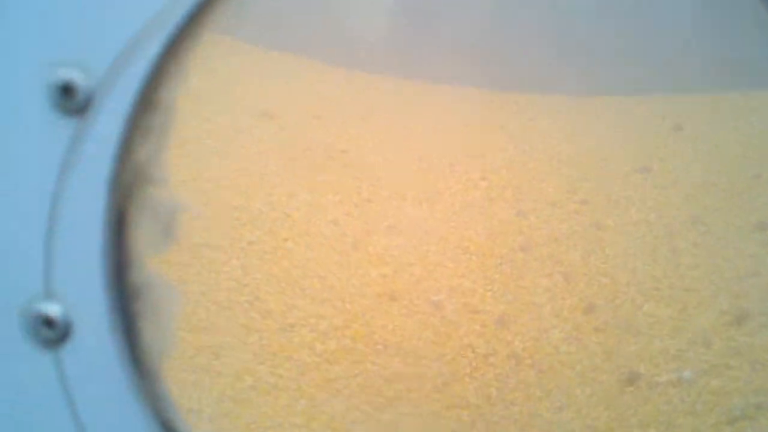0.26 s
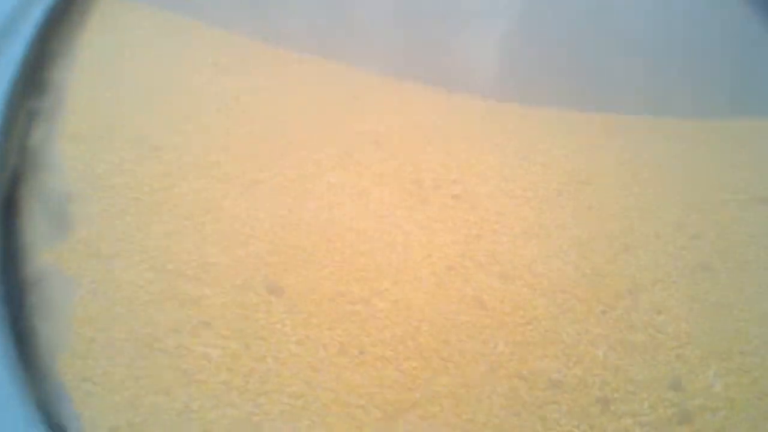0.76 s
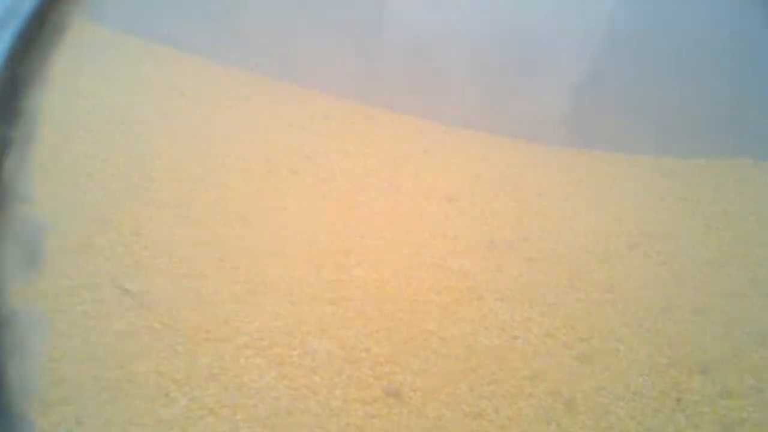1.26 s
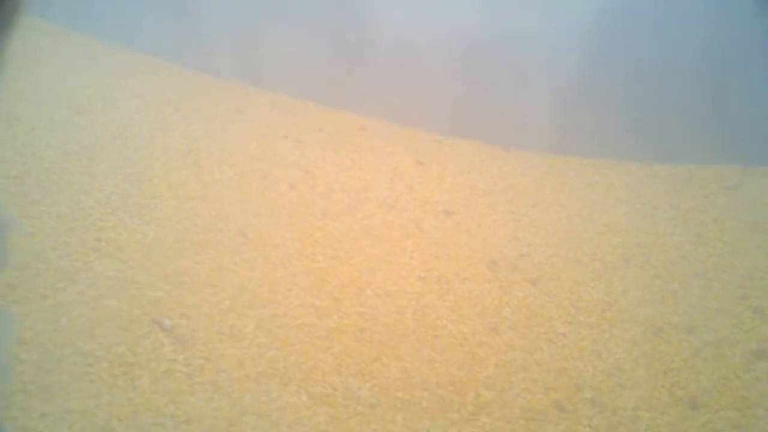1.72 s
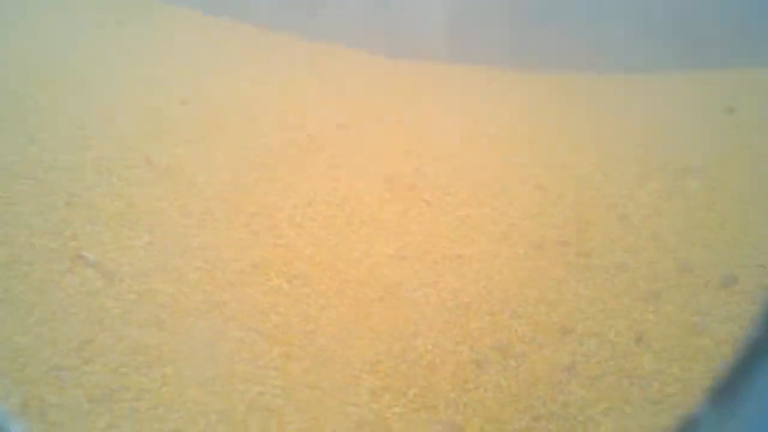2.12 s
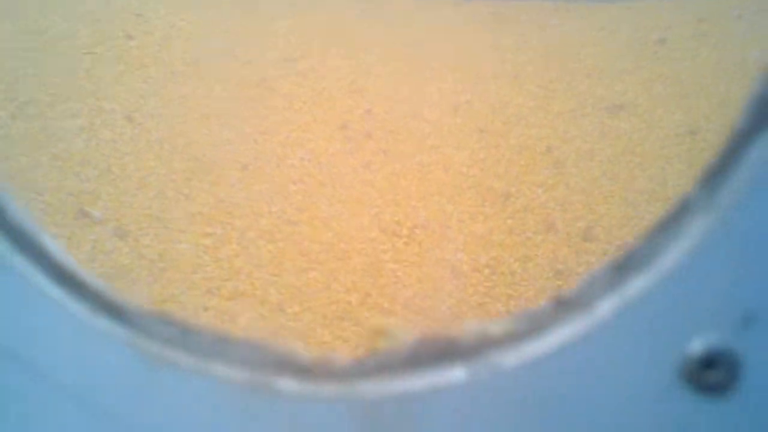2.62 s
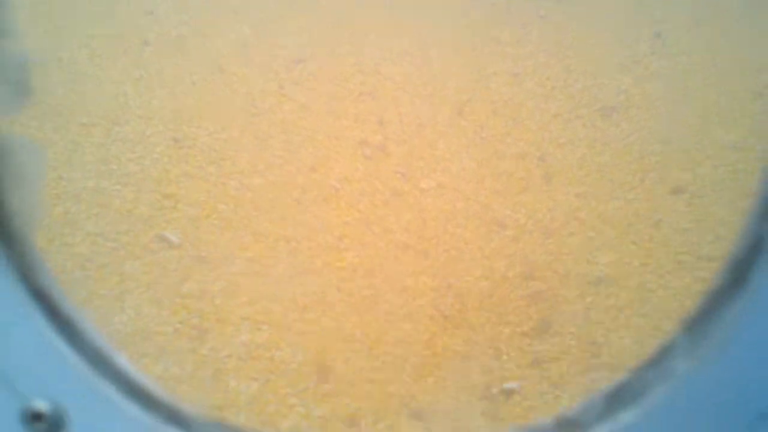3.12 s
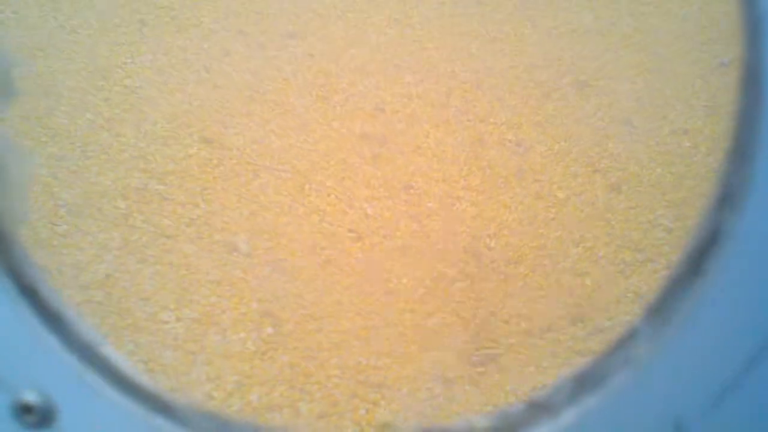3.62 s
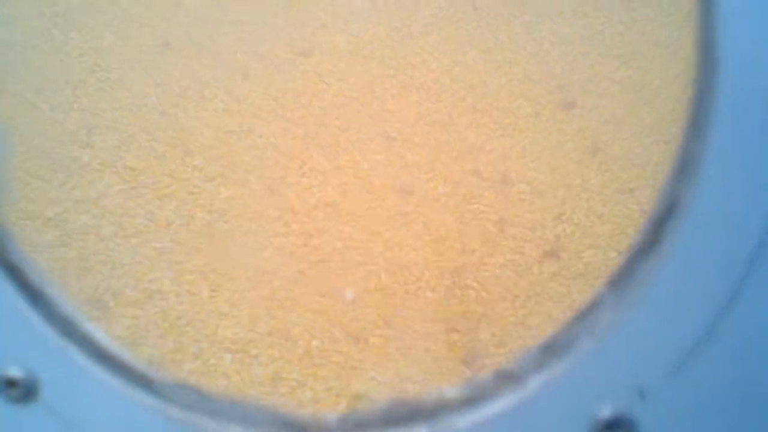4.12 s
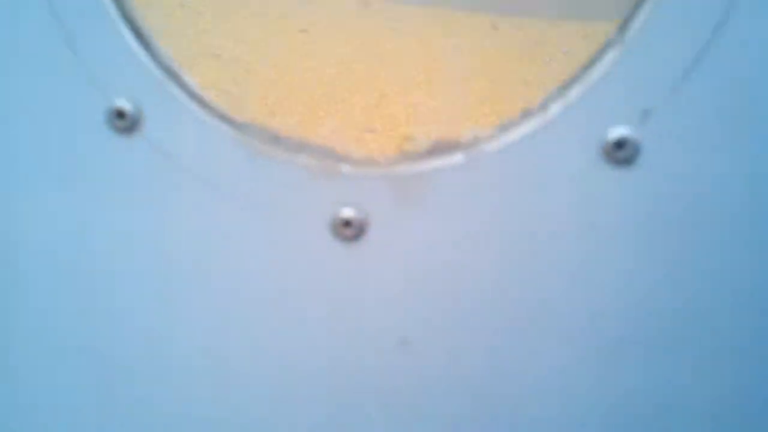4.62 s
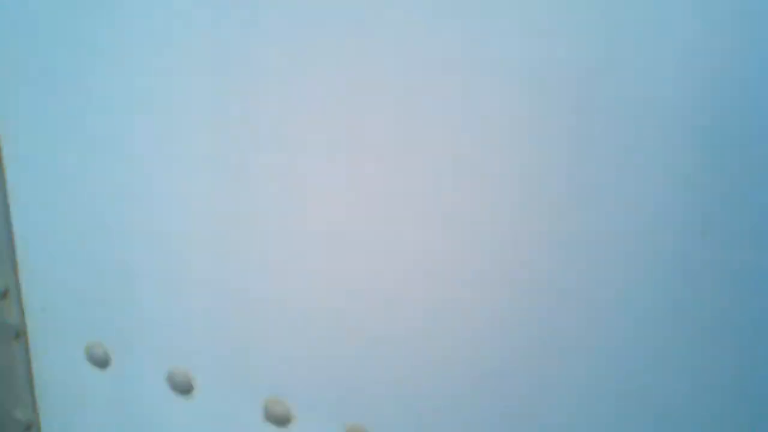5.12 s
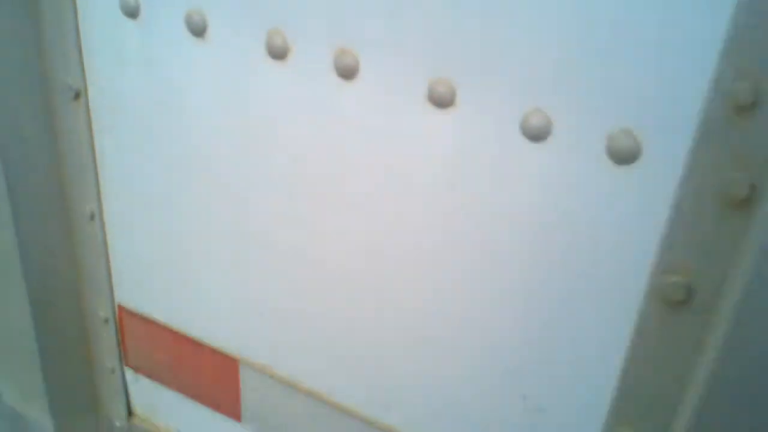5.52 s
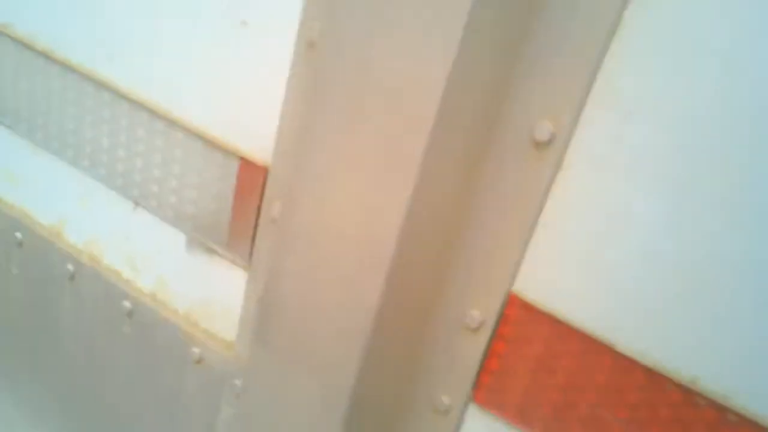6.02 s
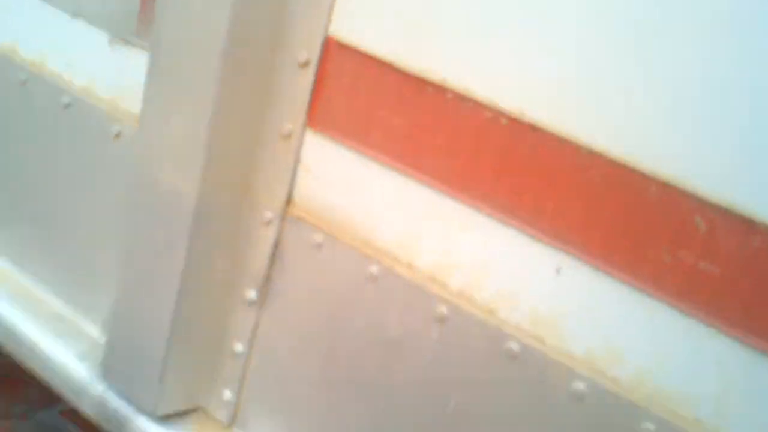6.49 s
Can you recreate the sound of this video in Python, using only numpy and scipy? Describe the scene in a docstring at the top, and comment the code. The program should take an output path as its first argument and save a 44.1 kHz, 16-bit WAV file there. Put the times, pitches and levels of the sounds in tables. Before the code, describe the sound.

A loud, continuous farm machine runs from start to finish at constant speed. A six-cylinder diesel gives a low, firm hum near 100 hertz with buzzing overtones, wrapped in broad roar and chain rattle. Over it lies a bright, dense hiss of corn rushing through the auger, swelling subtly about ten times a second. From about 1 to 2 seconds the hollow metallic drumming of the casing is fuller, easing by 3. Tiny metal ticks fall at about 2.6, 4.5 and 6.0 seconds. A thin whine on the left strengthens from 3 to 4.8 and again briefly near 5.8. From 4.8 the engine's upper tones soften as the phone turns toward the trailer wall, while the hiss grows slightly brighter. From 5.2 wind thumps and flutters irregularly, strongest around 6.35 to 6.5. The sound stops with the machine still running. Close, outdoor, phone-like stereo.

```python
"""Beside a trailer wall, a handheld phone close to the metal, a diesel-driven grain auger to its right.
The six-cylinder engine drones as sines on its cycle orders, with gear whine and drive-line tones above.
Coloured noise makes the roar, casing drum, rattle and the corn that hisses in time with the screw;
a few decaying sines tick. Towards the end wind noise and single pulses buffet the two microphone ports,
which the phone subtracts from each other for stereo."""
import sys
import numpy as np
from scipy import signal
from scipy.fft import rfft, irfft, next_fast_len
from scipy.io import wavfile
from scipy.ndimage import uniform_filter1d

SR = 44100
rng = np.random.default_rng(int(sys.argv[2]) if len(sys.argv) > 2 else 0)


def output_pcm(signal):
    """Save a mono or channel-first signal as 16-bit PCM at the path in sys.argv[1].

    Samples are clipped to [-1, 1] before scaling.
    """
    pcm = np.clip(np.atleast_2d(signal).T, -1, 1) * 32767
    wavfile.write(sys.argv[1], SR, np.round(pcm).astype(np.int16))


def ratio_of_db(decibels):
    """Turn decibels (scalar or array-like) into linear amplitude factors; 0 dB maps to 1."""
    return 10 ** (np.asarray(decibels, float) / 20)


N = 297655
PAD = next_fast_len(N)
TIME = np.arange(N) / SR
HZ = np.arange(PAD // 2 + 1) * SR / PAD
# All source levels below are those at the ports, before one port is subtracted from the other.


def on_time(table):
    """Columns of a curve table at every sample."""
    s, *columns = np.transpose(table)
    return [np.interp(TIME, s, c) for c in columns]


def on_hz(table):
    """Columns of a spectrum table at every frequency bin, interpolated over log frequency."""
    hz, *columns = np.transpose(table)
    return [np.interp(np.log(HZ + 1), np.log(hz), c) for c in columns]


def sound(bins):
    """Back from frequency bins to samples."""
    return irfft(bins, PAD)[..., :N]


def walk(rate):
    """Random levels held 1 / rate s and slewed twice; spread near 1."""
    hold = int(SR / rate)
    steps = np.repeat(rng.standard_normal(N // hold + 1), hold)
    return 1.15 * uniform_filter1d(uniform_filter1d(steps, hold), hold)[:N]


def noise(table, flicker_db, rate):
    """Noise of a given colour whose octave bands each flicker alone."""
    colour = ratio_of_db(on_hz(table)[0]) * np.sqrt(SR / 2)
    bins = rfft(rng.standard_normal(PAD)) * colour
    octave = np.log2(HZ / 40 + 1e-9)
    total = 0
    for k in range(10):
        band = np.clip(1 - abs(octave - k), 0, 1)
        total = total + sound(bins * band) * ratio_of_db(flicker_db * walk(rate))
    return total


def earlier(x, ms):
    """The same sound arriving ms sooner."""
    return sound(rfft(x, PAD) * np.exp(2j * np.pi * HZ * ms / 1000))


def tone(phase, waver_db, rate):
    """A sine, of rms 1 when steady, that wavers in level and phase."""
    level = np.sqrt(2) * ratio_of_db(waver_db * walk(rate))
    start = 2 * np.pi * rng.random()
    return level * np.sin(phase + start + 0.12 * waver_db * walk(rate))


def wind():
    """Eddies break on each port alone and come in quick puffs; buffets push one port and pull the other."""
    # Rising in gusts. Each row: time in seconds, middle level in dB.
    gusts = [(4.4, -45), (4.95, -42), (5.2, -27.5), (5.37, -32), (5.65, -25), (5.9, -29), (6.07, -25.5),
             (6.33, -28), (6.44, -19.5), (6.53, -19), (6.58, -29), (6.75, -25)]
    # Colour of the eddies. Each row: frequency in Hz, relative level in dB.
    eddy_colour = [(30, 2), (100, 2.5), (220, 2), (400, -4), (800, -11), (1400, -19), (2000, -28),
                   (3000, -26)]
    # Single buffets. Each row: centre in seconds, envelope peak in dB, frequency in Hz, puff of eddies in dB.
    buffets = [(5.172, -16, 200, -34), (5.381, -23, 200, -38), (5.62, -17, 170, -29),
               (5.835, -19, 100, -30), (5.952, -17, 200, -22), (6.025, -17, 240, -21),
               (6.065, -13, 200, -24), (6.239, -18, 210, -21), (6.354, -8, 190, -20),
               (6.425, -18, 260, -23), (6.466, -15, 320, -18), (6.51, -20, 400, -14.5),
               (6.614, -17, 220, -23), (6.739, -17, 250, -32)]
    puff_ms = 10
    eddies = np.array([noise(eddy_colour, 1.8, 40) for _ in range(2)])
    blow = ratio_of_db(on_time(gusts)[0] + 2.5 * walk(60))
    push = 0
    for s, db, hz, puff_db in buffets:
        turns = (TIME - s) * hz
        push = push + ratio_of_db(db) * np.exp(-(turns / 0.64) ** 2) * np.sin(2 * np.pi * turns)
        blow = blow + ratio_of_db(puff_db) * np.exp(-((TIME - s) * 1000 / puff_ms) ** 2)
    return blow * eddies / eddies.std() + np.array([push, -push])


def corn(level_db):
    """Kernels rushing up the tube, too dense to tell apart; each turn of the screw swells the hiss."""
    # Colour of the hiss. Each row: frequency in Hz, density in dB per Hz before the surge.
    hiss_colour = [(2000, -87), (3000, -70.5), (4000, -71.5), (5000, -67.5), (5700, -67), (6300, -63),
                   (7500, -59), (9000, -60), (11000, -62.5), (12500, -64.5), (13900, -62.5)]
    screw_hz, screw_crest_s, screw_db = 10.07, 0.095, 0.65
    swell_db = screw_db * np.cos(2 * np.pi * screw_hz * (TIME - screw_crest_s))
    surge_db = level_db + swell_db + 0.42 * walk(12)
    return ratio_of_db(surge_db) * np.array([noise(hiss_colour, 1.0, 13), noise(hiss_colour, 0.75, 17)])


def roar(cycle, roar_db, casing_db, rattle_db):
    """Broad machine noise from block, casing and chain that pumps a little with the firings."""
    # Block, fan and sheet metal, alike at both ports. Each row: frequency in Hz, basic density in dB per Hz.
    block_colour = [(30, -28), (70, -62), (130, -53), (220, -50.5), (370, -49.5), (500, -58), (700, -65),
                    (1000, -73.5), (1600, -89.5)]
    # Drumming auger casing, partly alike at the ports. Each row: frequency in Hz, basic density in dB per Hz.
    casing_colour = [(30, -64), (130, -81), (300, -67), (600, -62), (800, -64.5), (950, -67), (1200, -83),
                     (1600, -96)]
    # Chain and flights, unrelated at the ports. Each row: frequency in Hz, basic density in dB per Hz.
    rattle_colour = [(700, -91), (1050, -66), (1350, -67), (1570, -64.5), (1900, -66.5), (2200, -66),
                     (2280, -61.5), (2360, -83.5), (2800, -71.5), (3800, -81.5)]
    roar_lead_ms = 0.04  # sooner at the right port
    alike = 0.45  # share of the casing's power common to both ports
    # once every firing and once every second firing
    pump = ratio_of_db(0.6 * np.cos(6 * cycle) + 0.6 * np.cos(3 * cycle))
    block = noise(block_colour, 0.74, 6.21) * ratio_of_db(roar_db)
    both, left, right = (noise(casing_colour, 0.63, 7) * ratio_of_db(casing_db) for _ in range(3))
    casing = np.sqrt(alike) * both + np.sqrt(1 - alike) * np.array([left, right])
    rattle = np.array([noise(rattle_colour, 0.5, 7.7), noise(rattle_colour, 2.46, 10)]) * ratio_of_db(rattle_db)
    return pump * (np.array([block, earlier(block, roar_lead_ms)]) + casing + rattle)


def ticks():
    """Short light metal knocks from the drive, dying in a few milliseconds, nearer the left port."""
    # Each row: start in seconds, starting envelope at the left port in dB, frequency in Hz.
    knocks = [(2.6, -15, 1680), (4.47, -18, 1700), (6.041, -20, 2050)]
    left = 0
    for s, db, hz in knocks:
        age = np.maximum(TIME - s, 0)
        left = left + ratio_of_db(db) * np.exp(-age / 0.0019) * np.sin(2 * np.pi * hz * age)
    return np.array([left, 0.4 * left])


def gears(cycle, drive_db):
    """The whine reaches the left port only; the drive line sounds from the engine's side."""
    # Whine, louder and softer as the phone moves. Each row: time in seconds, level before waver in dB.
    whine_level = [(0, -50), (1.7, -49), (2.8, -51), (2.95, -43), (4.76, -37), (4.85, -46.5), (5.5, -47),
                   (5.8, -33.5), (6.3, -60), (6.75, -52)]
    # Drive-line tones off the engine's series. Each row: frequency in Hz, basic level in dB, waver in dB.
    drive_tones = [(165.6, -32.5, -0.5), (412, -44, 9)]
    whine = ratio_of_db(on_time(whine_level)[0]) * tone(84 * cycle, 3, 8)  # 84th order, 3 dB waver
    drive = 0
    for hz, db, waver_db in drive_tones:
        drive = drive + ratio_of_db(db) * tone(2 * np.pi * hz * TIME, waver_db, 5)
    drive = ratio_of_db(drive_db) * drive
    return np.array([drive + whine, earlier(drive, 0.24)])


def engine(cycle, firing_db, exhaust_db, block_db):
    """Clean orders of the cycle; the upper ones waver more, as echoes shift with the hand."""
    # Each row: order of the full cycle (six firings), left port in dB, right port in dB, before shading.
    orders = [(6, -20.9, -20.2), (9, -31.4, -30.9), (10, -37.0, -36.8), (12, -24.3, -23.7),
              (13, -40.5, -41.1), (15, -41.1, -39.3), (20, -44.1, -44.1), (22, -45.5, -43.7),
              (23, -45.5, -45.1), (24, -42.7, -42.5), (30, -44.8, -50.7), (31, -51.9, -50.4),
              (32, -47.1, -46.1), (33, -46.0, -45.6), (34, -47.7, -54.8), (35, -42.8, -47.6),
              (36, -45.4, -51.6), (37, -60.0, -48.0), (38, -51.6, -48.7), (39, -45.3, -55.6),
              (40, -55.5, -49.1), (41, -57.4, -49.6), (42, -46.0, -45.8), (43, -51.6, -51.8),
              (46, -52.2, -44.8), (47, -56, -55), (48, -53.8, -47.4), (50, -58, -51), (51, -57, -50),
              (52, -59.3, -48.1), (54, -59.8, -47.5), (57, -57, -55)]
    engine_lead_ms = 0.28  # sooner at the right port
    left = right = 0
    for order, left_db, right_db in orders:
        if order == 6:
            shade_db = firing_db
        elif order < 30:
            shade_db = exhaust_db
        else:
            shade_db = block_db
        line = tone(order * cycle, 0.2 + 0.025 * order, 3) * ratio_of_db(shade_db)
        left = left + ratio_of_db(left_db) * line
        right = right + ratio_of_db(right_db) * line
    return np.array([left, earlier(right, engine_lead_ms)])


def scene():
    """Pressure at both ports as the phone turns from engine to wall and past a rib, shading the machine."""
    # Each row: time in seconds, casing drum in dB, corn hiss in dB; the rattle follows the corn.
    layer_levels = [(0, -6, -0.5), (.6, -2, -0.5), (1.1, 5, -.5), (2.1, 4, -1), (3.0, -2.5, -0.4),
                    (4.6, -5, 0), (4.9, 0, .2), (5.3, 0, 1), (5.75, 2.5, 2), (6.05, 1, 1.4), (6.75, 2, 0.3)]
    firing_hz = 101.51
    turn_from_s, turn_to_s = 4.78, 6.12
    # level change of each layer in dB once the turn is complete
    shade_exhaust_db, shade_block_db, shade_roar_db = -9.5, -8.5, -2
    shade_firing_db, shade_drive_db, shade_rattle_db = -2, -7, -5
    turn = np.interp(TIME, [turn_from_s, turn_to_s], [0, 1])
    late = turn ** 2.4  # firing tone, drive line and rattle give way only late in the turn
    casing_db, corn_db = on_time(layer_levels)
    cycle = 2 * np.pi * firing_hz / 6 * TIME
    tones = engine(cycle, shade_firing_db * late, shade_exhaust_db * turn, shade_block_db * turn)
    tones = tones + gears(cycle, shade_drive_db * late)
    machine = roar(cycle, shade_roar_db * turn, casing_db, corn_db + shade_rattle_db * late)
    return tones + machine + ticks() + corn(corn_db) + wind()


def band_limit(x):
    """A steep low-pass at the top of the band."""
    return signal.sosfilt(signal.butter(12, 15070, fs=SR, output="sos"), x)


def record(dry):
    """Each channel is its port minus the other port a moment later, in part only in the treble."""
    # Share of the other port still subtracted above the split, heard as weak and unsteady treble stereo.
    # Each row: band in Hz, middle share left, right (0 to 1).
    treble_share = [(5200, 0.075, 0.44), (7800, 0.25, 0.24), (10400, 0.21, 0.19), (13000, 0.25, 0.16)]
    port_lag_s = 17 / SR
    split_hz, top_hz = 4300, 13950
    low_cut = signal.butter(3, 85, "high", fs=SR, output="sos")
    ports = rfft(signal.sosfilt(low_cut, dry), PAD) * (HZ < top_hz)
    other = ports[::-1] * np.exp(-2j * np.pi * HZ * port_lag_s)
    out = sound((ports - other) * (HZ < split_hz))
    lag_cycles = np.maximum(HZ, 5200) * port_lag_s
    for hz, left, right in treble_share:
        centre = round(hz * port_lag_s * 2) / 2  # in cycles of the port lag
        band = np.clip(1 - abs(lag_cycles - centre), 0, 1) * (HZ >= split_hz)
        share = np.clip(np.array([[left], [right]]) + 0.3 * walk(45), 0, 1)
        # the band keeps its loudness whatever the share
        out = out + (sound(ports * band) - share * sound(other * band)) / np.sqrt(1 + share ** 2)
    out = np.tanh(0.9 * out) / 0.9  # the loudest buffets are rounded off
    return band_limit(out)


dry = scene()
out = record(dry)
output_pcm(out)
```